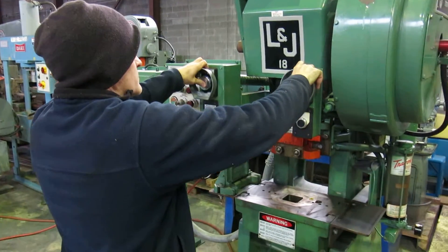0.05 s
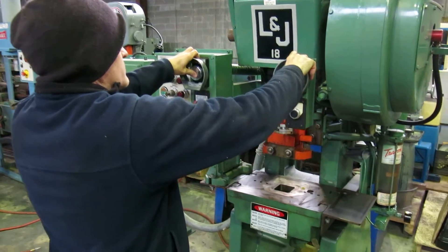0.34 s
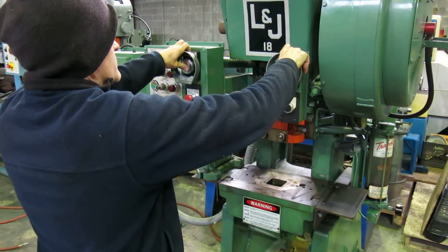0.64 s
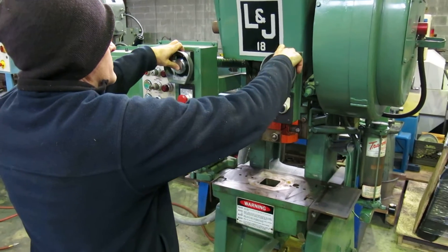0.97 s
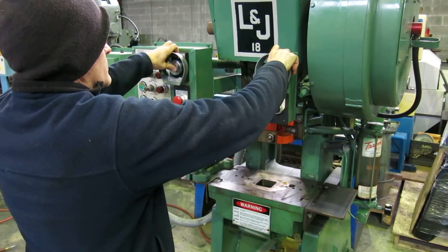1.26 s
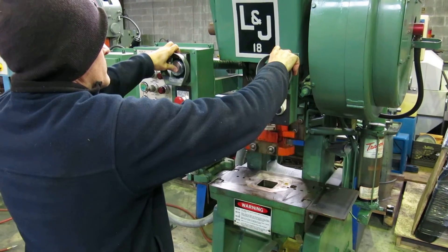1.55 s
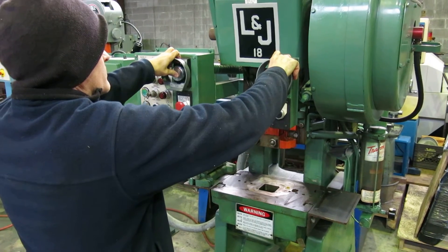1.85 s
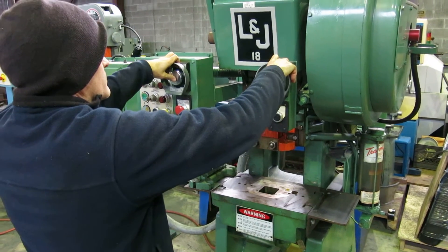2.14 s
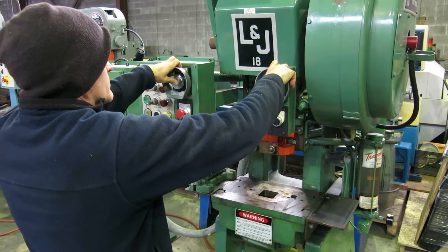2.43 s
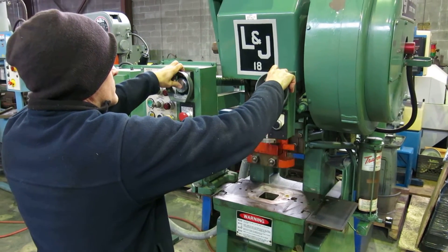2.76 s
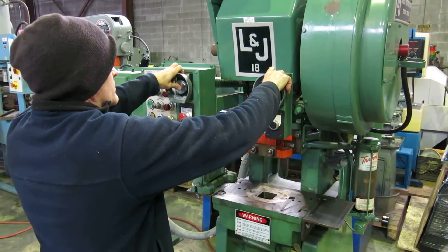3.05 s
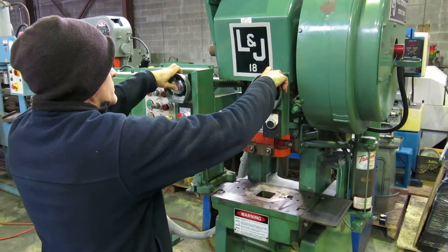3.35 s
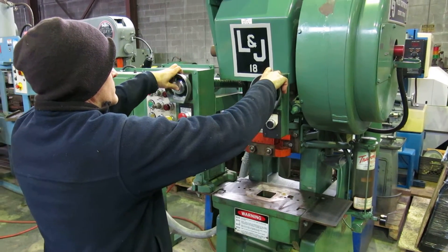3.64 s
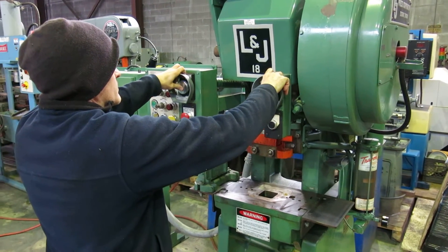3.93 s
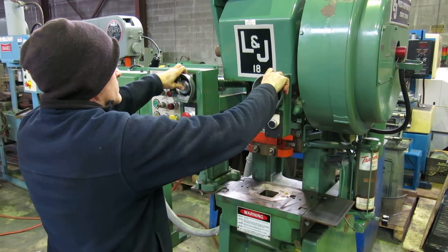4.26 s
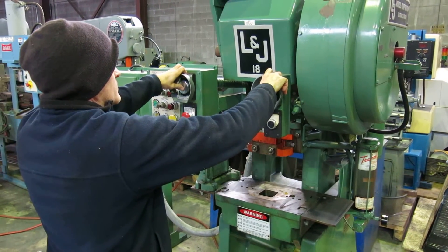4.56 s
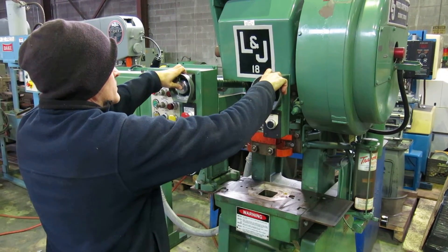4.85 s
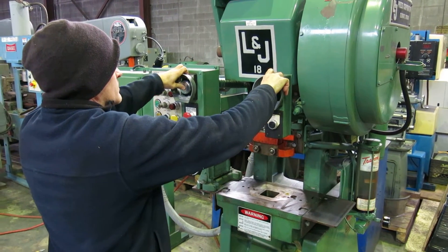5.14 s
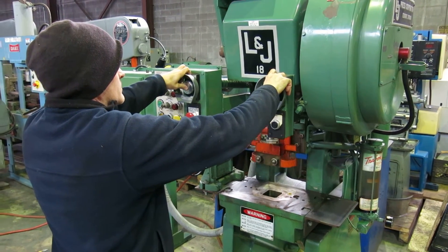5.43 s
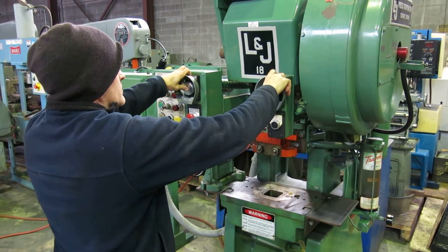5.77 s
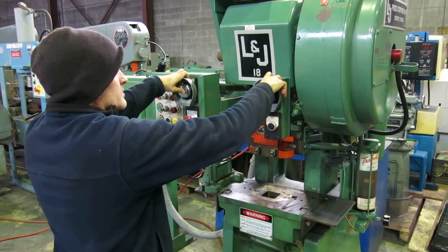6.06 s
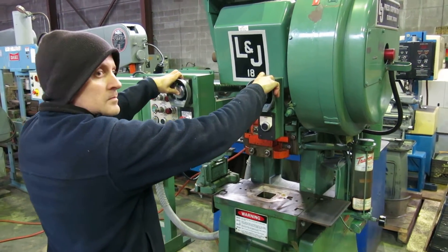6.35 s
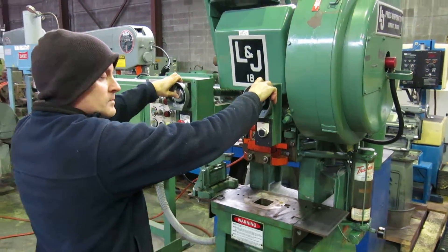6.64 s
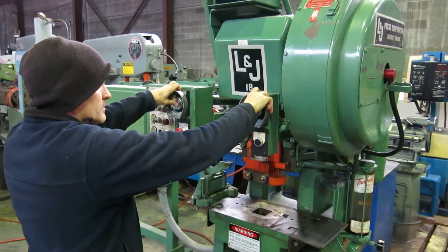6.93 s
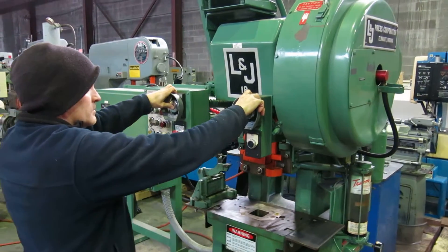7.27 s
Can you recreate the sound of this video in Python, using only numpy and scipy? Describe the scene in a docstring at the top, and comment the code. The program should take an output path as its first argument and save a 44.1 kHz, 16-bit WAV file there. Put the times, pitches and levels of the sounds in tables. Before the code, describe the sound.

A punch press runs six single strokes in a large workshop, heard from close by. Each begins with a small valve click and hiss, then a loud ringing metal knock. Less than half a second later comes a second heavy clank with a puff of released air, followed by a faint tick and sigh. The pairs come a little over a second apart, with a steady motor hum underneath.

```python
"""A punch press with an air clutch makes six single strokes over the hum of its motor in a large workshop.
In each stroke a valve clicks and air hisses into the clutch; the plates knock home and the flywheel
guard sings. As the ram runs round, the linkage ticks and air seeps. Then the air is dumped, the piston
thuds back and the brake clanks shut. Last, the ram settles with a tick and a sigh while the hall rings on.
Struck parts sound as sums of damped modes, air flows as shaped noise."""
import sys
import numpy as np
from scipy import signal
from scipy.fft import rfft, irfft
from scipy.io import wavfile
from scipy.ndimage import uniform_filter1d

SR = 44100
rng = np.random.default_rng(int(sys.argv[2]) if len(sys.argv) > 2 else 0)


def unload_audio(sound):
    """Save the sound as a 16-bit wav file, at the path given as the first command line argument."""
    columns = np.transpose(np.atleast_2d(sound))
    # keep every value between -1 and 1, then stretch to whole-number steps
    steps = np.round(np.clip(columns, -1, 1) * 32767)
    wavfile.write(sys.argv[1], SR, steps.astype(np.int16))


N = 330750

# valve openings: t/s, hiss level/dB, sizzle level/dB, plunger seating t/s, click level/dB
OPENINGS = [(0.0, -28, -44, .0098, 0), (1.229, -40.5, -50, 1.2366, -9), (2.498, -45, -56, 2.5055, -22),
            (3.789, -47.5, -59, 3.7905, -27), (5.143, -48.5, -59, 5.1475, -22.5),
            (6.663, -47, -57, 6.668, -26.5)]
# clutch knocks: t/s, blow level/dB, boost of the first contacts/dB, crack level/dB, guard and hall level/dB
KNOCKS = [(0.0705, -0.5, 10, 4, 2), (1.298, 0, 3.5, 4, -0.5), (2.5702, -1, 0.5, 2.5, -1),
          (3.8536, -3.5, 0, -0.5, -1), (5.2119, -3, 0, 1, 0), (6.7277, -3, 1.5, 0, -1)]
# air dumps: t/s, thud level/dB, exhaust level/dB, exhaust tilt/(dB per octave)
AIR_DUMPS = [(0.4705, 6, 5, -1), (1.6953, 3, 1, 0), (2.9712, 1.5, 1, -0.5), (4.2540, -0.5, 2.5, -1),
             (5.6138, 1, 1.5, -0.2), (7.1360, 0, 3, -1.5)]
# spectrum of escaping air: f/Hz, level/dB
AIR_SPECTRUM = [(1000, 6.5), (4000, 2.5), (6000, 5), (8000, -3.5), (10500, -4), (13000, -15), (16000, -31)]
# reverberation time of the hall: f/Hz, t60/s
HALL_DECAY = [(60, 1.84), (200, 2.53), (500, 2.8), (1300, 3.32), (2500, 2.48), (5000, 1.9), (9000, 1.18),
              (15000, 0.52)]


def amp(db):
    """Amplitude ratio of a level: a factor of ten per 20 dB."""
    return 10 ** (np.asarray(db) / 20)


def read(points, hz):
    """Linear interpolation of a table over log frequency."""
    f, value = np.transpose(points)
    return np.interp(np.log(hz + 1), np.log(f), value)


def clock(length):
    """Uniform sampling: the sample times over a length in seconds."""
    return np.arange(int(length * SR)) / SR


def add(mix, s, sound):
    """Superposition: a sound joins the mix at s seconds."""
    start = round(s * SR)
    sound = sound[..., max(-start, 0):]
    part = mix[:, max(start, 0):][:, :sound.shape[-1]]
    part += sound[..., :part.shape[1]]


def noise(colour, size, uneven=1):
    """Filtered stereo noise, rippled by small resonances; its channels are less coherent in the treble."""
    # depth of the ripple from countless small resonances: f/Hz, level/dB
    ripple_depth = [(500, 0.5), (1500, 5.5), (3000, 0), (15000, 1.5)]
    # stereo width at the microphone pair: f/Hz, side level re mid/dB
    width = [(50, -12), (160, -15.5), (400, -10.5), (800, -7.5), (1300, -5), (2400, -8.5), (4500, -10),
             (8000, -1), (15000, 0)]
    hz = np.fft.rfftfreq(size, 1 / SR)
    grid_hz = np.arange(0, SR / 2, 70)
    ripple = uneven * np.interp(hz, grid_hz, rng.standard_normal(len(grid_hz))) * read(ripple_depth, hz)
    mid, side = rfft(rng.standard_normal((2, size))) * amp(read(colour, hz) + ripple)
    mid, side = irfft([mid, side * amp(read(width, hz))], size)
    return np.array([mid + side, mid - side]) / mid.std()


def burst(colour, t60, rise):
    """Modal overlap: countless close modes excited at once merge into decaying noise."""
    t = clock(.5)
    return noise(colour, len(t)) * amp(-60 * t / t60) * (1 - np.exp(-t / rise))


def ring(modes, rise):
    """Free vibration of a struck part: a sum of exponentially damped sinusoids."""
    t = clock(1)
    vibration = sum(amp(db - 60 * t / t60) * np.sin(2 * np.pi * hz * t) for hz, db, t60 in modes)
    return vibration * (1 - np.exp(-t / rise))


def varied(modes, spread_db):
    """Modal excitation: each blow shares its force differently among the modes."""
    return [(hz, db + spread_db * rng.uniform(-0.79, 1), t60) for hz, db, t60 in modes]


def gust(rise, hold, t60):
    """Envelope of a transient flow: it builds up, holds and decays exponentially."""
    t = clock(2.4)
    return (1 - np.exp(-t / rise)) * amp(-60 * np.maximum(t - hold, 0) / t60)


def air(colour, flow):
    """Flow noise: its amplitude follows the flow, and pipes and castings colour it."""
    return flow * noise(colour, len(flow), uneven=1.25)


def tail(colour, ring_times, rise, size):
    """Diffuse reverberation: each band decays with its own reverberation time."""
    hz, t, bands = signal.stft(noise(colour, size, uneven=.6), SR, nperseg=1024)
    bands = bands * amp(-60 * t / read(ring_times, hz)[:, None])
    echoes = signal.istft(bands, SR)[1][:, :size]
    return echoes * (1 - np.exp(-np.arange(size) / SR / rise))


def halls(colour, rise, count):
    """Partly correlated reverberation of repeated blows: part stays alike, part changes as things move."""
    alike, *changed = [tail(colour, HALL_DECAY, rise, size=2 * SR) for _ in range(count + 1)]
    return [.6 * alike + .8 * part for part in changed]


def shop():
    """Line and continuous spectra: phase-modulated motor tones over the steady wash of the workshop."""
    # motor tones: f/Hz, rms level/dB
    motor_tones = [(120, -67), (199.2, -57.5), (242.2, -61.5), (689, -63), (1270, -60)]
    # spectrum of the workshop's background: f/Hz, level/dB
    wash = [(30, -14), (60, -14), (90, -3), (130, -1), (200, 7.5), (350, -0.5), (520, -1), (660, 0),
            (830, -27), (1300, -30), (2500, -22), (5000, -29), (7500, -22.5), (12000, -25), (16000, -29)]
    t = np.arange(N) / SR
    hum = np.zeros(N)
    for hz, db in motor_tones:
        waver = sum(np.sin(2 * np.pi * (rate * t + rng.random())) for rate in np.geomspace(.3, 5, num=8))
        hum += amp(db) * np.sqrt(2) * np.sin(2 * np.pi * hz * t + 0.44 * waver)
    return hum + amp(-52.5) * noise(wash, N, uneven=0)


def sighs():
    """The stopped ram settles with a tick; the last air sputters out as amplitude-modulated noise."""
    # settling after each stop: t/s, tick level/dB, sigh level/dB
    settlings = [(.818, -44, -42), (2.039, -41, -42), (3.287, -46, -47.5), (4.632, -44.5, -48.5),
                 (5.99, -48, -43), (7.454, -48, -49)]
    # spectrum of the sigh and its tick: f/Hz, level/dB
    colour = [(2000, -2), (4500, -1), (6500, 3), (10800, -1), (13000, -11), (16000, -22)]
    out = np.zeros((2, N))
    flow = gust(rise=0.011, hold=0.019, t60=0.42)
    for s, tick_db, sigh_db in settlings:
        add(out, s, amp(tick_db - 4) * burst(colour, t60=0.053, rise=0.001))
        sputter = uniform_filter1d(rng.standard_normal(len(flow)), size=200)
        sputter_db = 4.2 * flow * sputter / sputter.std()
        add(out, s + .03, amp(sigh_db - 6) * air(colour, flow * amp(sputter_db)))
    return out


def ram():
    """Impact and leak noise: the linkage ticks at one point of each turn, then air seeps until the dump."""
    # spectrum of the linkage tick: f/Hz, level/dB
    tick_colour = [(1000, -15), (3500, 1), (5200, 7.5), (8000, -4), (11500, -3.5), (16000, -21)]
    # spectrum of the seeping air: f/Hz, level/dB
    seep_colour = [(1500, 7), (2900, -4.5), (3800, -2), (5000, 3.5), (6800, -0.5), (8200, -7),
                   (10500, -17.5), (15000, -38)]
    tick_after_s = .2635
    out = np.zeros((2, N))
    for (_, hiss_db, *_), (knock_s, *_), (dump_s, *_) in zip(OPENINGS, KNOCKS, AIR_DUMPS):
        s = knock_s + tick_after_s
        tick = burst(tick_colour, t60=0.052, rise=0.0008)
        after_ring = amp(-12) * burst(tick_colour, t60=0.65, rise=0.0067)
        add(out, s, amp(-38.5) * (tick + after_ring))
        seep = gust(rise=0.013, hold=dump_s - s, t60=1.8)
        add(out, s, amp(hiss_db - 8.5) * air(seep_colour, seep) + amp(-54) * air(AIR_SPECTRUM, seep))
    return out


def valve():
    """Impact and flow noise: the plunger clicks home and air fills the clutch until the plates meet."""
    # modes of the plunger: f/Hz, level/dB, t60/s
    plunger_modes = [(2460, -13, 0.011), (3160, -10, 0.018), (3370, -7, 0.013)]
    # spectra of the inrush, its high sizzle and the valve's clicks: f/Hz, level/dB
    hiss = [(500, 11), (2000, 3), (3500, -4.5), (5000, 2.5), (7300, 2), (8600, -4.5), (10000, -9.5),
            (12000, -28), (16000, -38)]
    sizzle = [(4000, -7), (8000, -39), (10200, 8), (12300, 1), (13500, -7), (16000, -4)]
    click = [(300, -3), (1500, -8), (2600, 2), (3300, -10), (4200, -6.5), (7000, -11.5), (12000, -28),
             (16000, -34)]
    out = np.zeros((2, N))
    ping = ring(plunger_modes, rise=0.00044)
    for (s, hiss_db, sizzle_db, seat_s, click_db), (knock_s, *_) in zip(OPENINGS, KNOCKS):
        fill = gust(rise=0.0098, hold=knock_s - s, t60=0.23)
        add(out, s, amp(hiss_db + 2.5) * air(hiss, fill) + amp(sizzle_db) * air(sizzle, fill))
        add(out, s, amp(hiss_db - 2.5) * tail(hiss, HALL_DECAY, rise=0.022, size=2 * SR))
        add(out, s + 0.0018, amp(hiss_db + 8) * burst(click, t60=0.03, rise=0.00039))
        add(out, seat_s, amp(click_db) * ping)
        add(out, seat_s, amp(click_db - 10.5) * burst(click, t60=0.014, rise=0.00017))
    return out


def dump():
    """Pressure release: the exhaust opens with a spit, the piston thuds on its seat and air blasts out."""
    # modes of the piston: f/Hz, level/dB, t60/s
    piston_modes = [(194, -16, 0.067), (410, -18.5, 0.026), (578, -12.5, 0.018), (951, -36, 0.16)]
    # contacts within one thud: t/s from the dump, level/dB
    contacts = [(-.0055, -6.5), (-.0021, 3), (0, 1.5)]
    # spectrum of the exhaust blast: f/Hz, level/dB
    exhaust = [(100, -13), (300, 12.5), (1500, -4.5), (2600, 3), (4000, -4.5), (7000, -2.5), (9000, -6.5),
               (12000, -0.5), (16000, -15)]
    spit_lead_s = .025
    out = np.zeros((2, N))
    thud = ring(piston_modes, rise=0.00041)
    for s, thud_db, exhaust_db, tilt_db in AIR_DUMPS:
        add(out, s - spit_lead_s, amp(-36) * burst(AIR_SPECTRUM, t60=0.23, rise=.007))
        for delay, db in contacts:
            add(out, s + delay, amp(thud_db + db) * thud)
        colour = [(hz, db + tilt_db * np.log2(hz)) for hz, db in exhaust]
        add(out, s - .005, amp(exhaust_db - 19.5) * burst(colour, t60=0.24, rise=0.0073))
    return out


def brake():
    """Impact excitation: springs slam the brake shut; it chatters, and the cast frame's modes boom."""
    # brake closures: t/s, blow level/dB, hall level/dB
    closures = [(0.4896, 1, 2.5), (1.7150, 1, 3), (2.991, 0.5, -1), (4.273, 1.5, -0.5), (5.633, 0.5, -0.5),
                (7.155, 1, 0)]
    # contacts of the chatter: t/s from the closure, level/dB
    contacts = [(0, 2.5), (.0027, -2.5), (.0063, -5), (0.012, -3)]
    # modes of the brake and of the frame: f/Hz, level/dB, t60/s
    brake_modes = [(1054, -25, 0.047), (1250, -26.5, 0.31), (1490, -22.5, 0.086), (2046, -13.5, 0.019),
                   (2310, -7, 0.019), (2387, -19, 0.078), (2600, -29, 0.034), (2880, -14, 0.04),
                   (3137, -19, 0.031), (4650, -43, 0.18), (5350, -29.5, .07), (6700, -28, 0.063),
                   (6920, -31, 0.06)]
    frame_modes = [(106.5, -26, 0.08), (149.4, -14, 0.15), (199.2, -22.5, 0.48), (286, -22.5, 0.24),
                   (332.5, -16, 0.1), (364.2, -14, 0.16), (421, -35.5, 1), (486, -31.5, 1),
                   (580, -14, 0.066), (680, -9.5, 0.091)]
    # spectra of one contact, the near walls' echoes and the hall's reverberation: f/Hz, level/dB
    clank = [(100, -1), (300, -1.5), (700, 5), (1700, -8), (2500, 2), (3600, -4.5), (6500, -4), (9000, -9),
             (12000, -13), (16000, -27)]
    wall_colour = [(24, -61), (40, -35), (75, -16), (183, 1), (253, -10), (333, -4.5), (607, -12),
                   (687, -5.5), (860, -13), (1280, -5), (1610, -11.5), (4580, -20), (12700, -32),
                   (15500, -40)]
    hall_colour = [(24, -61), (40, -4), (96, -18), (139, 2), (235, -4), (342, -1.5), (450, -8.5), (497, -4),
                   (577, -14), (622, -9.5), (1250, -13), (1530, -16), (2330, -17), (7920, -33.5),
                   (15500, -56)]
    # decay time of the near walls' echoes: f/Hz, t60/s
    wall_decay = [(100, 0.23), (400, 0.77), (1500, 0.28), (5000, 0.42), (14000, 0.42)]
    out = np.zeros((2, N))
    reverberation = halls(hall_colour, rise=0.046, count=len(closures))
    for (s, blow_db, hall_db), hall in zip(closures, reverberation):
        add(out, s, amp(blow_db) * ring(brake_modes, rise=0.00046))
        add(out, s, amp(blow_db - 0.5) * ring(varied(frame_modes, spread_db=2.5), rise=0.0065))
        for delay, db in contacts:
            add(out, s + delay, amp(blow_db + db - 16.0) * burst(clank, t60=0.032, rise=0.00025))
        add(out, s, amp(blow_db - 20.0) * tail(wall_colour, wall_decay, rise=0.0036, size=SR))
        add(out, s, amp(hall_db - 28.5) * hall)
    return out


def clutch():
    """Impact and friction: the plates knock and scrape until they grip; the guard rattles and sings on."""
    # contacts within one knock: t/s from the main contact, level/dB
    contacts = [(-.0074, -10), (-.0049, -2), (0, 4.5), (.0045, -20)]
    # modes of the clutch and of the lightly damped flywheel guard: f/Hz, level/dB, t60/s
    clutch_modes = [(113, -23.5, 0.091), (272.4, -13, 0.056), (446, -10.5, 0.03), (593, -10, 0.032),
                    (775, -38.5, 0.41), (978, -17.5, 0.045), (1130, -20, 0.076), (1254, -32, .12),
                    (2940, -43, 0.048), (3410, -43.5, 0.14)]
    guard_modes = [(271, -40, 1.1), (426, -42, 2.1), (663, -36.5, 0.7), (990, -42, 1.8), (1130, -44.5, 3.2),
                   (1250, -43, 1.4), (1266, -36.5, 1.03), (1330, -53, 0.9), (1376, -45, 1),
                   (1460, -51, 0.74), (1980, -46, 1), (3950, -47, 0.41), (4718, -51, 0.76)]
    # spectra of the plates' crack, the guard's rattle and the hall's reverberation: f/Hz, level/dB
    crack = [(100, -41), (500, 16), (1200, -3.5), (1650, -2.5), (2800, -1), (3900, -1.5), (5000, -6.5),
             (6000, -7), (9000, -13), (11500, -11), (16000, -27)]
    rattle = [(100, -18), (300, 16), (1000, 0), (1350, -2), (1650, -10), (4000, -14), (6000, -12),
              (9000, -17), (12000, -11), (16000, -37)]
    hall_colour = [(24, -51), (40, -4.5), (208, -8), (266, 0), (359, -11), (428, 0.5), (522, -18),
                   (638, -3), (705, -12), (951, -13), (1080, -15), (1280, -8.5), (1570, -18.5),
                   (4810, -27.5), (15500, -34.5)]
    out = np.zeros((2, N))
    reverberation = halls(hall_colour, rise=0.0012, count=len(KNOCKS))
    for (s, blow_db, first_db, crack_db, ring_db), hall in zip(KNOCKS, reverberation):
        knock = ring(varied(clutch_modes, spread_db=2), rise=0.00036)
        for k, (delay, db) in enumerate(contacts):
            add(out, s + delay, amp(blow_db + db + first_db * (k < 2)) * knock)
        add(out, s - .0072, amp(crack_db + first_db - 17) * burst(crack, t60=0.033, rise=0.0014))
        add(out, s - .0008, amp(crack_db - 17) * burst(crack, t60=0.034, rise=0.00017))
        add(out, s, amp(crack_db - 26.0) * burst(rattle, t60=0.23, rise=0.0024))
        add(out, s, amp(ring_db - 0.5) * ring(varied(guard_modes, spread_db=2), rise=0.0049))
        add(out, s, amp(ring_db - 31.0) * hall)
    return out


def scene():
    """Superposition of the press's sounds and the workshop's background."""
    return valve() + clutch() + ram() + dump() + brake() + sighs() + shop()


def record(dry):
    """Filtering and overload: a low cut, two capsules of unequal colour, clipping, then a band limit."""
    # imbalance of the microphone pair: f/Hz, left level re right/dB
    imbalance = [(50, 3), (200, 1.5), (700, -1), (1400, -1.5), (2600, -1.5), (5000, 1.5), (10000, 1.5),
                 (15000, 2)]
    low_cut_hz, band_limit_hz = 84.5, 15800
    hz = np.fft.rfftfreq(N, 1 / SR)
    high_passed = signal.sosfilt(signal.butter(3, low_cut_hz, "high", fs=SR, output="sos"), dry)
    capsule_gains = amp(np.outer([1, -1], read(imbalance, hz)) / 2)
    heard = irfft(rfft(high_passed) * capsule_gains, N)
    clipped = np.clip(heard, -1, 1)
    low_pass = signal.firwin(511, band_limit_hz, window=("kaiser", 9), fs=SR)
    return signal.oaconvolve(clipped, low_pass[None], "same")


dry = scene()
out = record(dry)
unload_audio(out)
```